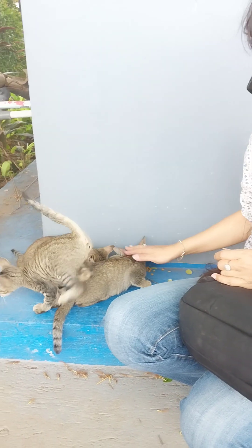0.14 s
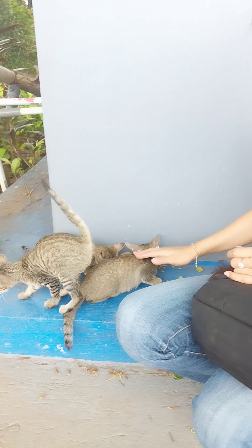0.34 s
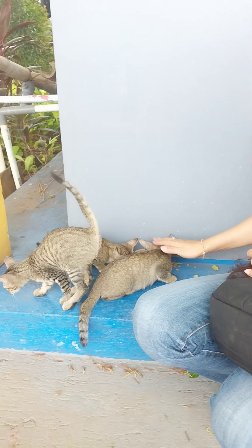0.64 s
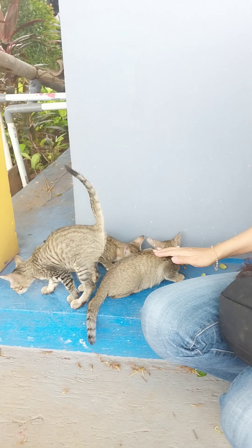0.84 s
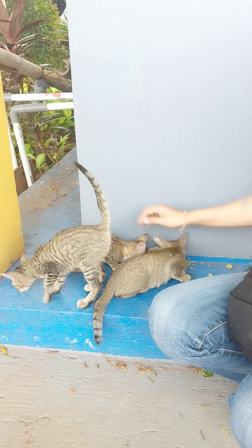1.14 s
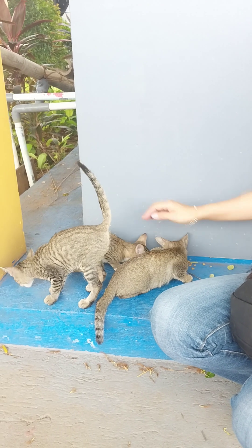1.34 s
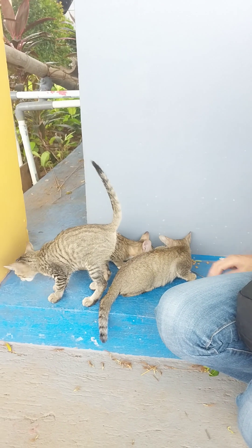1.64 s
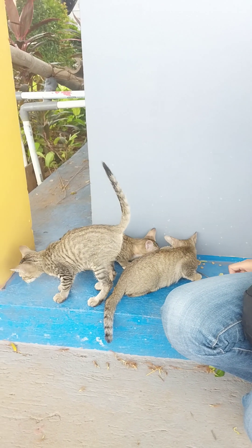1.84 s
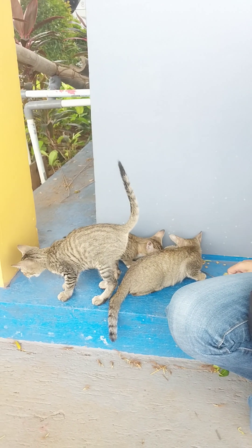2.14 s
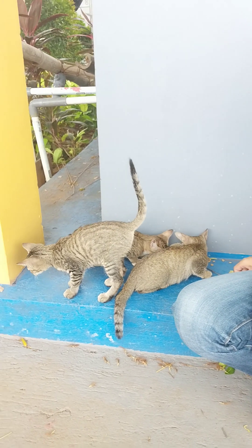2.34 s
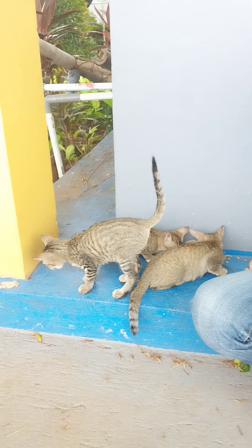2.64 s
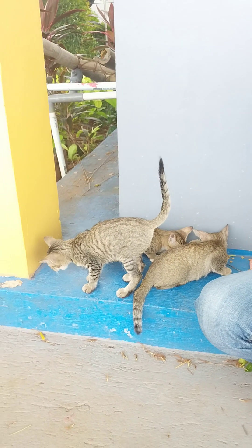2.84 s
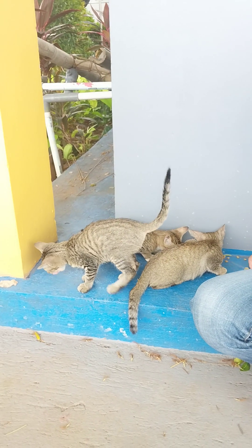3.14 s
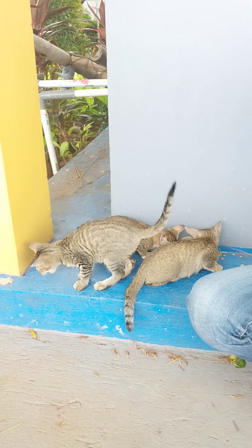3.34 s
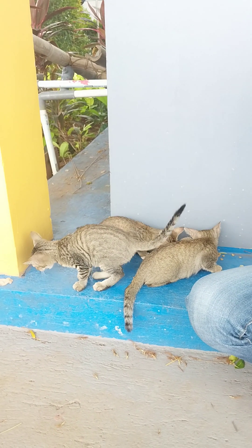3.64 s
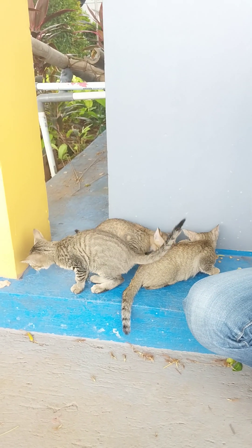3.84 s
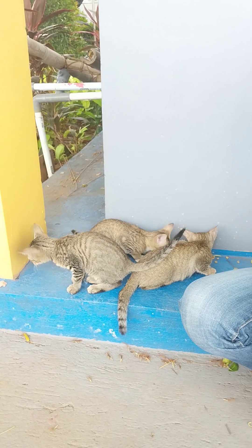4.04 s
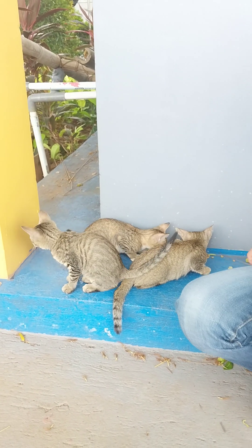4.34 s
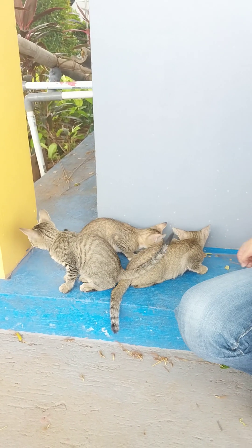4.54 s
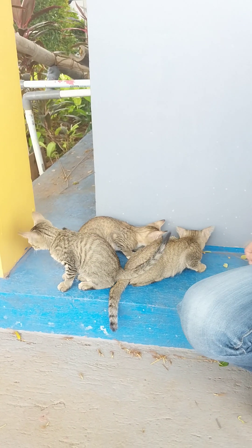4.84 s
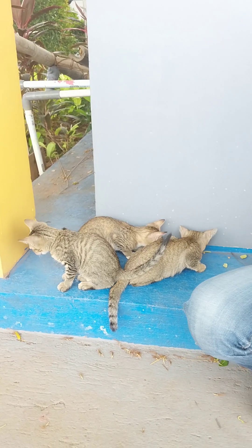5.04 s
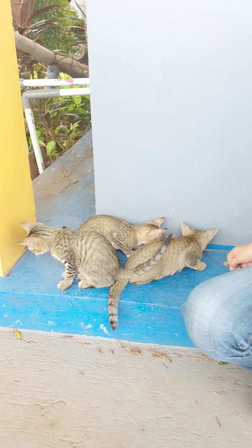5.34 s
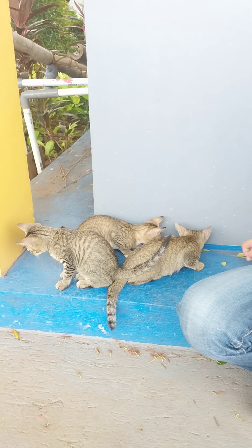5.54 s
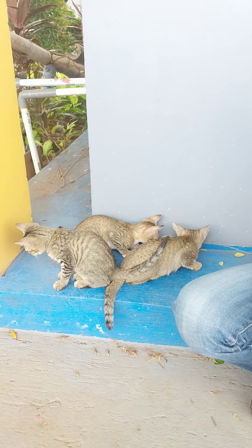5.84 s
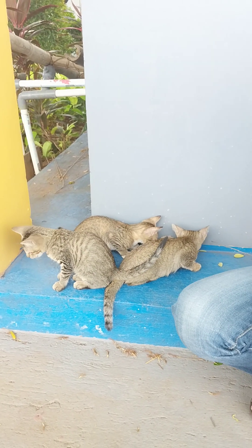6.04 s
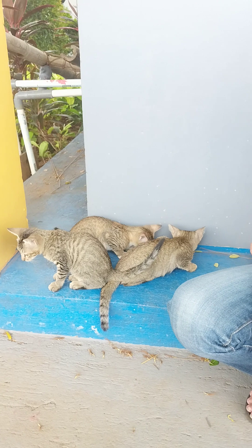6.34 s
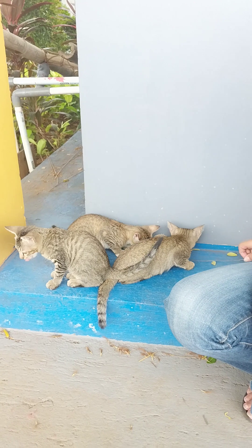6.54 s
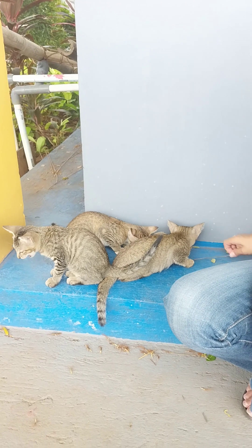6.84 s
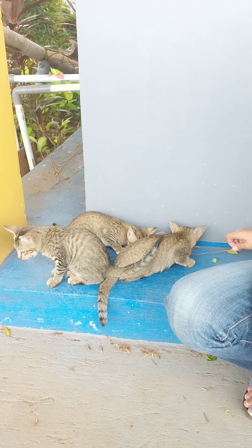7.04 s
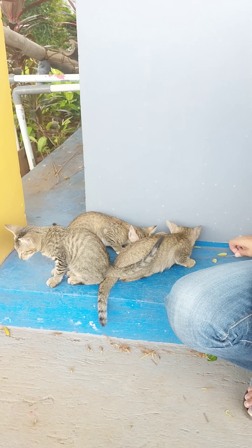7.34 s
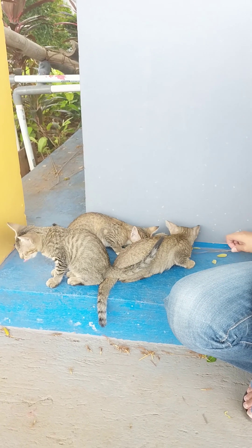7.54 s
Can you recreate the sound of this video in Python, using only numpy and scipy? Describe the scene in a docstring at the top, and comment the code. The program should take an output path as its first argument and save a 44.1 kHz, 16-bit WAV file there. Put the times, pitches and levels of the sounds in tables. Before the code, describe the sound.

A small single-cylinder vehicle putters by out of sight, its pitch sinking, over steady road rumble, with a thin metallic hiss that breaks up and fades.

```python
"""Traffic rumble and hiss, and a small single-cylinder vehicle droning past behind a wall as it slows down;
a second one fades further off. Engines are multiples of a gliding firing rate, lifted by standing waves
between the walls; traffic is shaped noise. A bright mechanical hiss, noise ringing in small metal cavities,
swells with the pass, breaks into puffs and dies away. A wavering hum, faint short gliding calls and dry
ticks are added. Two microphone ports a hand apart."""
import sys
import numpy as np
from scipy import signal
from scipy.fft import rfft, irfft, next_fast_len
from scipy.io import wavfile
from scipy.ndimage import uniform_filter1d, map_coordinates

SR = 44100
rng = np.random.default_rng(int(sys.argv[2]) if len(sys.argv) > 2 else 0)


def inscribe(sig):
    """Save sig as 16-bit PCM at rate SR to the path in sys.argv[1].

    A 1-D sig is mono; a 2-D sig holds one channel per row.
    Samples are clipped to [-1, 1] before scaling.
    """
    pcm = np.round(np.clip(np.atleast_2d(sig).T, -1, 1) * 32767)
    wavfile.write(sys.argv[1], SR, pcm.astype(np.int16))


N = 339129
T_S = np.arange(N) / SR
LEFT_RIGHT = np.array([[1], [-1]])


def amp(db):
    """Amplitude ratio of a level in dB."""
    return 10 ** (np.asarray(db) / 20)


def unit(x):
    """x scaled to rms 1."""
    return x / np.sqrt(np.mean(x ** 2) + 1e-20)


def along(points, hz):
    """(f/Hz, value) points interpolated on a log frequency axis."""
    f, v = np.transpose(points)
    return np.interp(np.log(hz + 1), np.log(f + 1), v)


def curves(rows):
    """One value per sample for each column after the time."""
    t_s, *columns = np.transpose(rows)
    return [np.interp(T_S, t_s, column) for column in columns]


def wobble(rate_hz):
    """Smooth random curve, rate_hz knots a second."""
    knots = rng.standard_normal(int(N * rate_hz / SR) + 4)
    return map_coordinates(knots, [np.arange(N) * rate_hz / SR])


def filtered(x, response):
    """x times a complex response of frequency."""
    m = next_fast_len(N + 8192)
    return irfft(rfft(x, m) * response(np.fft.rfftfreq(m, 1 / SR)), m)[..., :N]


def rush(gain, alike, patchy_db):
    """Stereo noise of rms 1, coloured by gain(hz), with time-frequency patches of random level."""
    z = signal.stft(rng.standard_normal((2, N)), nperseg=512)[2]
    field = rng.standard_normal(z.shape[1:])
    field = uniform_filter1d(field, size=6, axis=0)  # bins
    field = uniform_filter1d(field, size=12, axis=1)  # frames
    pair = signal.istft(z * amp(patchy_db * unit(field)), nperseg=512)[1][:, :N]

    def mid_side_gain(hz):
        turn = np.arccos(np.clip(along(alike, hz), -1, 1)) / 2  # port correlation = cos(2 turn)
        return gain(hz) * np.array([np.cos(turn), np.sin(turn)])

    mid, side = filtered(pair, mid_side_gain)
    return unit(np.array([mid + side, mid - side]))


def leading(pair, lead_s):
    """The left port hears the sound lead_s earlier than the right."""
    return filtered(pair, lambda hz: np.exp(1j * np.pi * hz * lead_s * LEFT_RIGHT))


# tyre hiss: t/s, level/dB
TYRE_LEVEL = [(0, -45), (.7, -46), (1.4, -45), (2.7, -44), (3.2, -45), (4.35, -45.5), (4.9, -48),
              (5.3, -49.5), (6.5, -47.5), (7.69, -48)]
# airy band of the roar: t/s, level/dB
WASH_LEVEL = [(0, -46), (1.2, -51), (2, -50.5), (3.1, -52.5), (4.3, -51), (5, -60), (5.9, -55.5),
              (6.5, -51), (7.69, -53)]
# drone swells: t/s, rise/dB, half length/s
DRONE_SWELLS = [(1.2, 9.5, 0.35), (2.62, 9, 0.076), (4.34, 6.5, .2)]
# layer spectra (drone: hollow band of the roar): f/Hz, relative density/dB
RUMBLE_SHAPE = [(12, -64), (20, -34), (53, -8), (70, -3), (108, 2), (195, -2.5), (226, -0.5), (258, -7.5),
                (329, -17), (500, -22.5), (650, -50), (1100, -120)]
ROAR_SHAPE = [(160, -23.5), (280, 1.5), (341, -8.5), (456, -10.5), (638, -6.5), (830, -9), (1030, -8),
              (1600, -15.5), (2080, -56), (3520, -120)]
TYRE_SHAPE = [(650, -27), (1100, -14.5), (1790, -6), (2110, -6), (3400, -9), (3680, -11.5), (5410, -17),
              (7300, -20), (8520, -26.5), (12700, -30), (15500, -43.5)]
DRONE_SHAPE = [(330, -36), (480, -18), (530, 0), (630, -1.5), (740, -5.5), (1000, -34.5)]
WASH_SHAPE = [(1000, -43), (1300, 2.5), (1600, 2), (1900, 4.5), (2100, -14), (2800, -40)]
# left-right likeness of the traffic: f/Hz, correlation
TRAFFIC_ALIKE = [(40, 0.48), (150, 1), (380, 0.79), (950, 0.41), (2400, 0.23), (6000, 0.0071),
                 (15000, 0.076)]
# mean level, and dB per dB of swing in the tyre hiss
RUMBLE_DB, RUMBLE_FOLLOWS = -26, 0.41
ROAR_DB, ROAR_FOLLOWS = -40.5, 0.85
DRONE_DB, DRONE_FOLLOWS = -50.5, 1.45  # before swells and wobble


def traffic():
    """Far road noise in five bands that swing together, except the wash; unrelated at the ports in the treble."""
    tyre_db = curves(TYRE_LEVEL)[0]
    swing_db = tyre_db - tyre_db.mean()
    rumble_db = RUMBLE_DB + RUMBLE_FOLLOWS * swing_db
    roar_db = ROAR_DB + ROAR_FOLLOWS * swing_db
    swell_db = sum(db * np.exp(-((T_S - s) / half_s) ** 2) for s, db, half_s in DRONE_SWELLS)
    drone_db = DRONE_DB + DRONE_FOLLOWS * swing_db + swell_db + 1.9 * wobble(3.94)
    wash_db = curves(WASH_LEVEL)[0] + 0.73 * wobble(4)
    layers = (  # level, spectrum, patchiness/dB
        (rumble_db, RUMBLE_SHAPE, 1.2),
        (roar_db, ROAR_SHAPE, 1.1),
        (tyre_db, TYRE_SHAPE, .8),
        (drone_db, DRONE_SHAPE, 1.5),
        (wash_db, WASH_SHAPE, 1.2))
    return sum(amp(level_db) * rush(lambda hz: amp(along(shape, hz)), TRAFFIC_ALIKE, patchy_db)
               for level_db, shape, patchy_db in layers)


# faint calls: t/s, length/s, start f/Hz, end f/Hz, level/dB of partials 1, 2, 3
CALLS = [(2.72, 0.047, 524, 539.7, -70, -41, -72), (4.4, 0.088, 482, 490, -39.5, -70, -70),
         (4.71, .165, 530, 479.4, -49, -50, -50), (4.81, 0.28, 520, 516.3, -46, -71, -62),
         (5.272, 0.037, 489.4, 482.6, -76, -52, -47), (5.52, 0.066, 522, 497.2, -70, -65, -51)]


def calls():
    """Short gliding harmonic tones, each under a half-sine power envelope."""
    out = np.zeros(N)
    for start_s, length_s, start_hz, end_hz, *partial_db in CALLS:
        u = np.linspace(0, 1, round(length_s * SR))
        phase = 2 * np.pi * np.cumsum(start_hz + (end_hz - start_hz) * u) / SR
        tone = sum(amp(db) * np.sin(k * phase) for k, db in enumerate(partial_db, 1))
        out[round(start_s * SR):][:len(u)] += np.sqrt(2 * np.sin(np.pi * u)) * tone
    return out


def orders(rate_hz, numbers, gains, drift_rad, flutter_db):
    """Multiples of a rate, one ringing pulse a cycle; echoes make each drift, flutter and differ at the ports."""
    crank = 2 * np.pi * np.cumsum(rate_hz) / SR
    out = np.zeros((2, N))
    for k, gain in zip(numbers, gains):
        ring = 0.11 * (k - 4.5) ** 2 + np.angle(gain)  # the pipe lets the high orders out first
        apart = 0.073 * rng.standard_normal() * LEFT_RIGHT
        level = np.sqrt(2) * abs(gain) * amp(flutter_db * wobble(9))
        out += level * np.cos(k * crank + ring + drift_rad * wobble(3) + apart)
    return out


# hum: t/s, level/dB
HUM_LEVEL = [(0, -50), (1.5, -61), (2.5, -57), (2.9, -53.5), (4.3, -48.5), (4.7, -57), (5.3, -45.5),
             (5.7, -49), (6, -62), (7.69, -71)]
HUM_HZ = 379


def hum():
    """One steady-pitched partial, wavering in phase and level."""
    return orders(np.full(N, HUM_HZ), [1], amp(curves(HUM_LEVEL)), drift_rad=0.7, flutter_db=5.0)


# hiss: t/s, level/dB
HISS_LEVEL = [(0, -54.5), (.5, -51.5), (1, -51.5), (1.22, -48), (1.45, -50.5), (1.7, -49.5), (2.1, -50.5),
              (2.4, -48), (2.65, -42.5), (3.3, -47.5), (3.9, -46.5), (4.2, -52), (4.7, -60.5), (5.1, -71),
              (5.7, -74), (6.3, -90)]
# broad spectrum: f/Hz, relative density/dB
HISS_BED = [(2060, -28.5), (3500, -18), (4140, -1), (5280, 8.5), (6360, -30), (7430, -6.5), (9960, -2.5),
            (12000, -6.5), (15500, -13)]
BED_DB = -23.0  # bed against cavity modes
# cavity resonances: f/Hz, half width/Hz, relative peak/dB
CAVITY_MODES = [(5216, 64, 3.5), (7390, 205, -1), (8950, 47, -29), (11600, 410, -5.5), (12800, 290, -12),
                (13600, 660, -8)]
HISS_LEAD_S = 0.000448  # further to the left than the low sounds
PASS_S, PASS_SPAN_S, SHIFT_RATIO = 2.9, 1.6, .016


def cavity_noise():
    """Noise ringing in small metal cavities; the pass shifts its pitch from raised to lowered."""
    def colour(hz):
        modes = sum(amp(2 * db) * w * w / ((hz - c) ** 2 + w * w) for c, w, db in CAVITY_MODES)
        return np.sqrt(amp(2 * along(HISS_BED, hz) + BED_DB) + modes * (hz > 3000))  # power sum

    noise = leading(rush(colour, [(5000, 0.23), (15000, 0.15)], patchy_db=1.1), HISS_LEAD_S)
    speed = 1 - SHIFT_RATIO * np.tanh((T_S - PASS_S) / PASS_SPAN_S)
    # running sum started at zero: arrives faster while nearing, slower while leaving
    read = np.cumsum(speed)
    return unit(np.array([map_coordinates(port, [read], mode="mirror") for port in noise]))


# hiss sinks and snaps back: t of return/s, depth/dB
HISS_DIPS = [(3.368, 5), (3.461, 8), (3.562, 9), (3.661, 9), (3.764, 9), (3.846, 9), (3.912, 5), (3.955, 3),
             (4.02, 4), (4.13, 3), (4.361, 6), (4.438, 4), (4.518, 4), (4.6, 6), (4.773, 5)]
DIP_S = 0.065
TREBLE_DB, BRIGHTENS_DB_PER_S = -1.5, 1.06  # treble gain at t = 0, and its growth


def swelling_hiss(noise):
    """Cavity noise that swells, breaks up in dips and grows brighter with time."""
    level_db = curves(HISS_LEVEL)[0] + 0.6 * wobble(12)
    for s, depth_db in HISS_DIPS:
        level_db -= depth_db * np.interp(T_S, [s - DIP_S, s - .008, s, s + .003], [0, 1, 1, 0])
    treble_db = TREBLE_DB + BRIGHTENS_DB_PER_S * T_S
    treble = filtered(noise, lambda hz: np.clip((hz - 8500) / 1500, 0, 1))
    return amp(level_db) * (noise + (amp(treble_db) - 1) * treble)


# late treble puffs: t/s, level/dB
PUFFS = [(4.6, -63), (4.775, -71), (4.966, -66), (5.147, -63), (5.229, -61), (5.33, -66), (5.438, -64),
         (5.546, -64), (5.665, -65), (5.779, -65), (5.9, -69)]
PUFF_T60_S = .3
# dry ticks: t/s, nominal peak level/dB
TICKS = [(3.6616, -39), (3.8468, -40), (3.9135, -40), (5.1776, -43), (5.683, -51), (6.0631, -48),
         (6.8644, -53), (6.982, -48), (7.1462, -51)]
TICK_T60_S, TICK_CREST_DB = .08, 12


def puffs_and_ticks(noise):
    """Treble of the cavity noise in bursts with a sharp onset and exponential decay."""
    bursts = [(s, db, PUFF_T60_S) for s, db in PUFFS]
    bursts += [(s, db - TICK_CREST_DB, TICK_T60_S) for s, db in TICKS]
    envelope = np.zeros(N)
    for s, db, t60_s in bursts:
        onset = np.clip((T_S - s) / .0015, 0, 1)
        envelope += onset * amp(db - 60 * np.maximum(T_S - s, 0) / t60_s)
    top = filtered(noise, lambda hz: amp(along([(8000, -22.0), (11000, 1.0), (15000, 7)], hz)))
    return envelope * unit(top)


def hiss():
    """Swelling hiss, puffs and ticks share one cavity noise."""
    noise = cavity_noise()
    return swelling_hiss(noise) + puffs_and_ticks(noise)


# exhaust pipe: f/Hz, gain/dB
PIPE = [(60.0, -23.8), (72.0, -21.5), (85.0, -2), (130.0, -1), (200.0, -5), (240.0, -7), (270.0, -14.5),
        (320.0, -30.5)]
# standing waves between the walls: f/Hz, half width/Hz, level over the direct sound/dB
WALL_MODES = [(103.8, 2, 8.7), (113, 3, 1), (147.7, 2.6, 9.5), (167.3, 2, -1), (183, 6.8, 4.5),
              (204, 2.1, 4.2)]


def exhaust(rate_hz, level_db, numbers):
    """Complex gain of each order after the pipe and the standing waves it glides through."""
    hz = np.outer(numbers, rate_hz)
    walls = 1 + sum(amp(db) * w / (w + 1j * (hz - c)) for c, w, db in WALL_MODES)
    return amp(level_db + along(PIPE, hz)) * walls


# far engine: t/s, firing f/Hz, level before the pipe/dB
FAR_RUN = [(.4, 34, -47), (.9, 33.6, -45.5), (1.8, 33.9, -36.5), (2.1, 32.57, -32.5), (3.15, 31.74, -34.5),
           (3.6, 30.8, -59)]
# multiples of the firing rate
FAR_ORDERS = [3, 5]
# gain of each far order/dB, favouring the fifth
FAR_ORDERS_DB = [
    [-3],
    [2.5],
]


def far_engine():
    """Two orders of a slowing exhaust, strongly fluttering."""
    rate_hz, level_db = curves(FAR_RUN)
    gains = exhaust(rate_hz, level_db, FAR_ORDERS) * amp(FAR_ORDERS_DB)
    return orders(rate_hz, FAR_ORDERS, gains, drift_rad=1.0, flutter_db=2.5)


# near engine: t/s, firing f/Hz, level before the pipe/dB
NEAR_RUN = [(0, 42.32, -43.5), (.5, 41.19, -37.5), (1, 40.6, -32.5), (1.5, 40.55, -30.5), (2, 39.55, -37.5),
            (2.5, 39.54, -30.5), (3, 40.6, -35), (3.3, 40.48, -37), (3.5, 39.3, -39.5), (4.2, 38.22, -39),
            (4.33, 37.54, -34), (4.52, 36.3, -29.5), (4.65, 35.3, -29), (4.8, 34.47, -30),
            (5.4, 33.37, -27.5), (5.7, 32.95, -27.5), (6.2, 30.8, -30.5), (6.6, 29.97, -35),
            (7, 29.32, -35.5), (7.69, 28.1, -35.5)]
# multiples of the firing rate
NEAR_ORDERS = [2, 3, 4, 5, 6, 7, 8, 9]
FLUTTER_DB, FLUTTER_DB_PER_DB = 1.1, .12  # at the loudest, and growth as the level falls


def near_engine():
    """Exhaust pulses of the passing engine; the fainter it is, the more its orders flutter."""
    rate_hz, level_db = curves(NEAR_RUN)
    flutter_db = FLUTTER_DB + FLUTTER_DB_PER_DB * np.clip(level_db.max() - level_db, 0, 10)
    gains = exhaust(rate_hz, level_db, NEAR_ORDERS)
    return orders(rate_hz, NEAR_ORDERS, gains, drift_rad=.35, flutter_db=flutter_db)


LEAD_S = .00012  # low sounds reach the left port first


def scene():
    """Traffic, calls, hum and engines share one direction; the hiss has its own."""
    low = traffic() + calls() + hum() + far_engine() + near_engine()
    return leading(low, LEAD_S) + hiss()


# port sensitivity: f/Hz, left minus right/dB
LEFT_DB = [(60, -1.5), (150, -2.5), (380, -2.5), (950, -3.0), (2380, -2.0), (5980, -2), (15000, 1.5)]
TOP_HZ = 15750


def record(dry):
    """The two ports differ in sensitivity; nothing passes above the band limit."""
    return filtered(dry, lambda hz: amp(along(LEFT_DB, hz) * LEFT_RIGHT / 2) * (hz < TOP_HZ))


dry = scene()
out = record(dry)
inscribe(out)
```